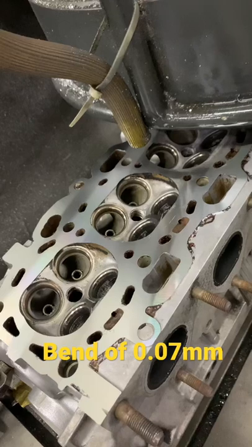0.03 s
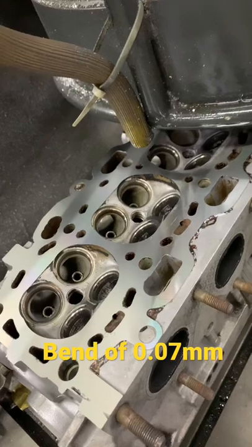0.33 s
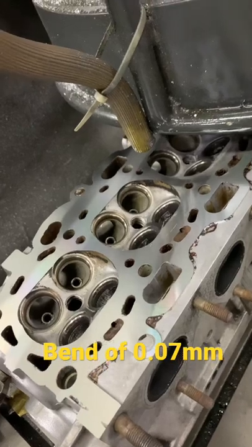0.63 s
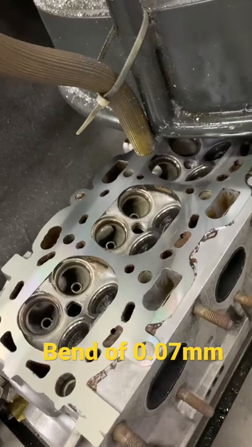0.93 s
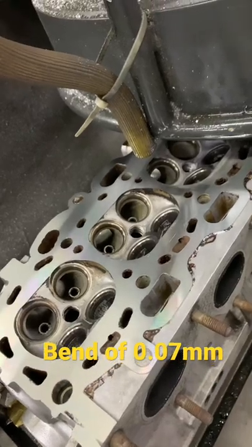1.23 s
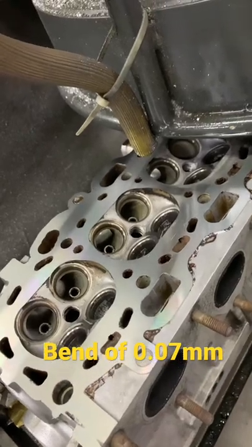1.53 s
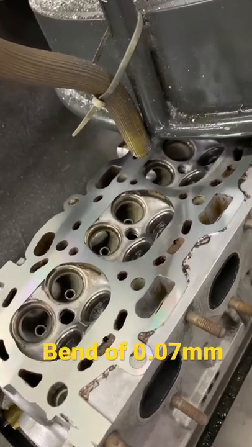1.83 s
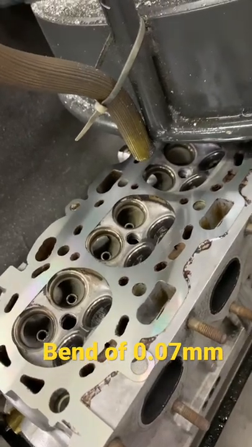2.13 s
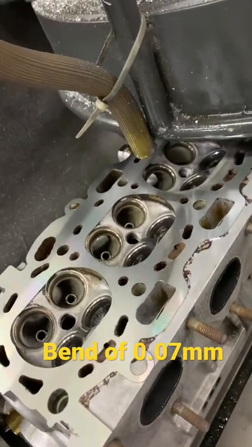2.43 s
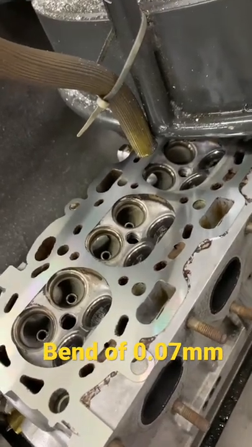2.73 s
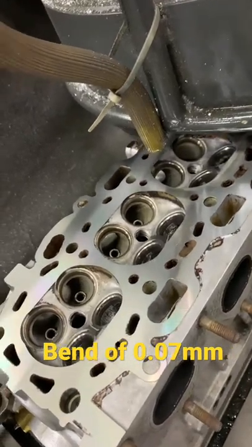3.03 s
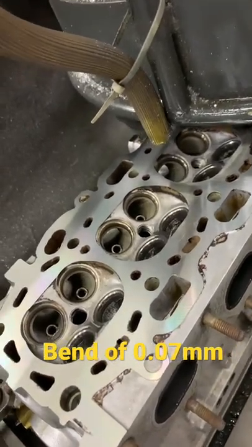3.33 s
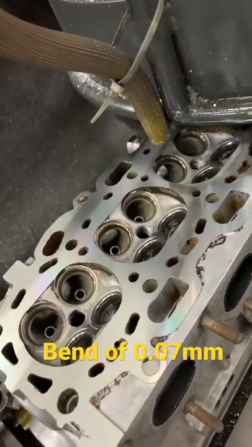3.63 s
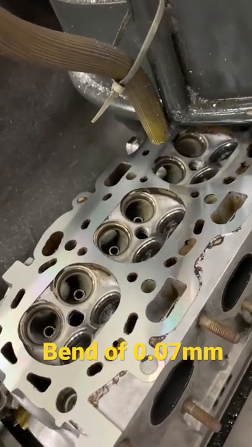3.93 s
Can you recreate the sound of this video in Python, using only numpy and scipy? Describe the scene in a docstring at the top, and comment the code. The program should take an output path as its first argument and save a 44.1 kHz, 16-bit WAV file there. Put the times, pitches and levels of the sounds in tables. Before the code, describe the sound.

A spinning cutter scrapes metal in rapid, chirping strokes while the machine hums and briefly clanks.

```python
"""A fast, gritty scraping with a chirp on every stroke: a surfacing machine skims an engine's
cylinder head, close by in a workshop. Once a turn the cutter scrapes the metal, ticks on an edge and
rings the cavity it crosses, first a deep one, later a shallow one. Underneath lies a bed of motor hum,
thin drive whine, rumble and hiss. Midway, sheet metal clanks and thumps twice with a puff of hiss."""
import sys
import numpy as np
from scipy import signal
from scipy.fft import rfft, irfft
from scipy.io import wavfile

SR = 44100
rng = np.random.default_rng(int(sys.argv[2]) if len(sys.argv) > 2 else 0)


def bounce(signal):
    """Save signal as a 16-bit WAV file at the path given by the first command-line argument."""
    frames = np.transpose(np.atleast_2d(signal))
    limited = np.clip(frames, -1, 1)
    pcm = np.round(limited * 32767).astype(np.int16)
    wavfile.write(sys.argv[1], SR, pcm)


N = 176400
TIME, FREQS = np.arange(N) / SR, np.fft.rfftfreq(N, 1 / SR)
SPIN_HZ, FIRST_CUT_S = 15.338, .0815


def amp(db):
    """Decibels to gain."""
    return 10 ** (np.asarray(db) / 20)

def unit_rms(x):
    """Scales to rms 1."""
    return x / np.sqrt(np.mean(x ** 2) + 1e-20)

def curve(points):
    """Draws a curve over the spectrum on a log-frequency axis."""
    hz, value = np.transpose(points)
    return np.interp(np.log(FREQS + 1), np.log(hz + 1), value)

def fader(points):
    """A level ride as a gain per sample."""
    return amp(np.interp(TIME, *np.transpose(points)))

def drift(rate_hz):
    """Random wander of rms 1, mostly slower than rate_hz."""
    return unit_rms(irfft(rfft(rng.standard_normal(N)) / (1 + (FREQS / rate_hz) ** 4), N))

def swell(start_s, rise_s, fall_s):
    """Linear attack, exponential decay."""
    age = np.maximum(TIME - start_s, 0)
    return np.minimum(age / rise_s, 1) * np.exp(-np.maximum(age - rise_s, 0) / fall_s)

# Stereo balance, left over right: f/Hz, level/dB
PAN = [(60, 0), (130, 1.5), (290, -0.8), (640, -1.5), (1300, -2), (3100, -2), (6800, 0)]
# Phase lead of the left side, on top of its head start: f/Hz, phase/rad
LEFT_LEAD = [(300, 0.39), (560, -2.5), (700, -1), (1400, -0.62), (4400, -0.53), (6200, -0.23)]
def stereo_image(head_start_s=.000116):
    """Left and right response: treble reaches the left first."""
    side = amp(curve(PAN) / 2)
    lead = curve(LEFT_LEAD) + 2 * np.pi * FREQS * head_start_s
    return np.array([side * np.exp(1j * lead), 1 / side])

def place(x):
    """Sets a compact source in the stereo image."""
    return irfft(rfft(x) * stereo_image(), N)

# How alike left and right are: f/Hz, coherence/0..1
COHERENCE = [(60, .99), (280, .97), (700, .62), (1900, .38), (3000, .42), (4300, .72), (5500, .96)]
def colour(pair, eq):
    """EQs two unrelated noises and blends them into one wide source."""
    a, b = rfft(pair)
    alike = np.clip(curve(COHERENCE), 0, 1)
    blend = np.array([a, alike * a + np.sqrt(1 - alike ** 2) * b]) * stereo_image()
    return irfft(blend * amp(curve(eq)) * np.sqrt(SR / 2), N)

def housing(x, wet_db, t60):
    """Short reverb: scatter off the guard and the machine bed."""
    t = TIME[:SR // 4]
    tail = rng.standard_normal((2, len(t))) * amp(-60 * t / t60) * (t > .003)
    return x + amp(wet_db) * signal.fftconvolve(x, tail / np.linalg.norm(tail[0]), axes=1)[:, :N]

def turn(delay_s, spread_db):
    """Time since the cutter last struck, and a random strength for each turn."""
    turns = (TIME - FIRST_CUT_S - delay_s) * SPIN_HZ + 2
    strengths = amp(spread_db * rng.standard_normal(N))
    return turns % 1 / SPIN_HZ, strengths[turns.astype(int)]

def groove_noise(repeat_share):
    """Noise that partly loops every turn, as the cutter retraces its groove."""
    groove = rng.standard_normal((2, round(SR / SPIN_HZ)))
    loop = groove[:, np.arange(N) % groove.shape[1]]
    return np.sqrt(repeat_share) * loop + np.sqrt(1 - repeat_share) * rng.standard_normal((2, N))

def tones(partials, waver_rad, flutter_db, rate_hz):
    """Held sines that waver in phase and level."""
    return sum(np.sqrt(2) * amp(db + flutter_db * drift(rate_hz))
               * np.sin(2 * np.pi * (hz * TIME + rng.random()) + waver_rad * drift(rate_hz))
               for hz, db in partials)

def ringing(modes, age, rough_rad):
    """Metal modes dying away from a blow, roughened by phase jitter."""
    return sum((-1) ** k * amp(db - 60 * age / t60)
               * np.sin(2 * np.pi * hz * age + rough_rad * drift(64))
               for k, (hz, db, t60) in enumerate(modes))


# Noise bed of the machine: f/Hz, level/dB per Hz
BED_EQ = [(28, -87), (45, -62.5), (65, -56), (110, -57), (145, -50), (210, -55.5), (275, -51), (340, -55),
          (480, -61), (620, -62), (1000, -67), (1500, -69.5), (2800, -76.5), (3400, -74.5), (3900, -68),
          (4350, -69), (4700, -73.5), (5250, -81), (5900, -68), (7900, -71.5), (9000, -75.5), (9900, -80.5),
          (10250, -75), (10700, -83), (15000, -82)]
def rumble_and_hiss(ripple_db=2.4, ripple_width_hz=60):
    """The machine's fluttering noise bed, with a fine, fixed random ripple colouring its treble hiss."""
    noise = groove_noise(.12) * amp(drift(24))
    bands = np.interp(FREQS / ripple_width_hz, np.arange(SR // 10), rng.standard_normal(SR // 10))
    ripple = amp(ripple_db * bands * np.clip(FREQS / 3000, 0, 1))
    return colour(unit_rms(irfft(rfft(noise) * ripple, N)), BED_EQ)

# Partials of the drive: f/Hz, level/dB
DRIVE_PARTIALS = [(3765, -52), (3952, -54), (6982, -54), (7252, -52), (7521, -51.5), (7720, -52.5),
                  (7790, -54.5), (7904, -50)]
def drive_whine():
    """The drive sings a thin, shimmering top."""
    return place(tones(DRIVE_PARTIALS, waver_rad=1, flutter_db=5.5, rate_hz=13))

# Partials of motor and frame: f/Hz, level/dB
MOTOR_PARTIALS = [(142, -47.5), (269.2, -33), (459.8, -37.5), (644, -51), (659, -49.5), (884, -48),
                  (981, -50)]
def motor_hum():
    """Motor and frame hold a gently wavering drone."""
    return place(tones(MOTOR_PARTIALS, waver_rad=.38, flutter_db=3, rate_hz=6.2))

# Frame tones that follow the deep cavity, at their loudest: f/Hz, level/dB
FRAME_FOLLOWING = [(491.5, -36.5), (983, -45.5)]
# Frame tone that ducks under the deep cavity, before ducking: f/Hz, level/dB
FRAME_DUCKING = [(537, -35.5)]
def frame_hum():
    """The frame's tones trade weight as the cutter leaves the deep cavity."""
    deep = fader(DEEP_RIDE) / fader(DEEP_RIDE).max()
    following = tones(FRAME_FOLLOWING, waver_rad=.37, flutter_db=3.5, rate_hz=4.1) * deep ** .5
    ducking = tones(FRAME_DUCKING, waver_rad=.3, flutter_db=1.5, rate_hz=3.3) * (1 - .22 * deep)
    return place(following + ducking)

# Blow on the sheet metal and its rebound: t/s, level/dB
PANEL_BLOWS = [(1.689, -1.5), (1.766, -10)]
# Dull body of the thump: f/Hz, level/dB per Hz
THUMP_EQ = [(60, -82), (170, -52), (270, -38.5), (350, -47.5), (430, -40), (520, -46.5), (650, -57.5),
            (1100, -62.5), (2200, -65), (3200, -92)]
# Airy top of the puff: f/Hz, level/dB per Hz
PUFF_EQ = [(2000, -86), (3200, -66.5), (5000, -57.5), (7000, -58), (10000, -65), (15000, -72)]
def thump(from_hz=460, to_hz=352, sag_s=.0475):
    """A double blow bends a panel's ring downward; the sheet metal booms on under a puff of hiss."""
    first_s = PANEL_BLOWS[0][0]
    punch = sum(amp(db) * swell(at, rise_s=.034, fall_s=.032) for at, db in PANEL_BLOWS)
    tail = amp(-4.5) * swell(first_s, rise_s=.034, fall_s=.22)
    boom = colour(rng.standard_normal((2, N)), THUMP_EQ) * np.hypot(punch, tail)
    puff = colour(rng.standard_normal((2, N)), PUFF_EQ) * swell(first_s, rise_s=.016, fall_s=.1)
    panel_hz = to_hz + (from_hz - to_hz) * np.exp(-np.maximum(TIME - first_s, 0) / sag_s)
    panel_gain = sum(amp(db - 12.5) * swell(at, rise_s=.013, fall_s=.022) for at, db in PANEL_BLOWS)
    panel = np.sin(2 * np.pi * np.cumsum(panel_hz) / SR) * panel_gain
    return boom + puff + place(panel)

# Modes of the sheet metal: f/Hz, level/dB, t60/s
SHEET_MODES = [(427, -16.5, 0.81), (1042, -27, 0.31), (2270, -34, 0.22), (5420, -9, 0.076),
               (5740, -18, 0.075)]
def clank(start_s=1.697, rise_s=.007):
    """Struck sheet metal gives the thump a sharp front."""
    age = np.maximum(TIME - start_s, 0)
    return place(ringing(SHEET_MODES, age, rough_rad=.78) * np.minimum(age / rise_s, 1))

def chirp(ride, from_hz, to_hz, glide_s, delay_s, rise_s, fall_s, rough_rad):
    """A short gliding ring once a turn, choked as the cutter moves on."""
    age, strength = turn(delay_s, spread_db=1.4)
    cycles = to_hz * age + (from_hz - to_hz) * glide_s * (1 - np.exp(-age / glide_s))
    cycles *= 1 + .012 * drift(SPIN_HZ)  # each turn is slightly detuned
    envelope = (1 - np.exp(-(age / rise_s) ** 2)) * np.exp(-(age / fall_s) ** 2)
    tone = np.sqrt(2) * np.sin(2 * np.pi * cycles + rough_rad * drift(215))
    return tone * envelope / envelope.max() * strength * fader(ride)

# Level ride of the edge tick: t/s, level/dB
TICK_RIDE = [(0, -25), (1.2, -31), (2.1, -34), (2.6, -31), (3.05, -28), (3.45, -31), (3.65, -23.5),
             (3.87, -23), (4, -27)]
# Bright colour of the tick: f/Hz, relative level/dB
TICK_EQ = [(500, -22), (3000, -3), (6000, 2), (7900, 11), (9000, -2), (15000, -4)]
# Level ride of the casting's clack, ring and knock: t/s, level/dB
BODY_RIDE = [(0, -28), (1.5, -34), (2.2, -33), (2.7, -29.5), (3.4, -28), (4, -33)]
# Boxy colour of the clack: f/Hz, relative level/dB
CLACK_EQ = [(300, -10), (600, 5), (1700, -10), (3200, -23)]
# Modes of the casting: f/Hz, relative level/dB, t60/s
CASTING_MODES = [(656, 2.5, 0.036), (796, -8, 0.21), (1020, -6, .08), (1506, -7, 0.053), (1796, -7, 0.26),
                 (8370, -4.5, 0.06)]
def edge_hits():
    """The cutter hits an edge: a bright tick, a short clack, a falling knock and the casting's ring."""
    age, strength = turn(delay_s=.0015, spread_db=1.16)
    attack = np.minimum(age / .001, 1) * strength
    tick = unit_rms(colour(groove_noise(.51), TICK_EQ))
    tick *= attack * np.exp(-age / .0068) * fader(TICK_RIDE)
    clack = amp(2) * unit_rms(colour(rng.standard_normal((2, N)), CLACK_EQ))
    clack *= attack * np.exp(-age / .0062) * fader(BODY_RIDE)
    ring = ringing(CASTING_MODES, age, rough_rad=.41) * strength * fader(BODY_RIDE)
    knock = chirp(BODY_RIDE, from_hz=766, to_hz=495, glide_s=.0049,
                  delay_s=.00099, rise_s=.0051, fall_s=.0086, rough_rad=.19)
    return tick + clack + housing(place(ring + knock), wet_db=-21, t60=.028)

# Level ride of the deep cavity: t/s, level/dB
DEEP_RIDE = [(0, -27), (.15, -24.5), (.7, -26.5), (1.2, -31.5), (1.35, -35.5), (1.6, -51), (2, -38)]
# Level ride of the shallow cavity: t/s, level/dB
SHALLOW_RIDE = [(1.6, -38.5), (2, -37), (2.3, -30.5), (2.8, -29), (3.1, -30.5), (3.45, -36.5), (3.7, -51)]
def cavities():
    """Cavities ring under the cutter: first a falling chirp, later a shorter, drier, rising one."""
    deep = chirp(DEEP_RIDE, from_hz=2170, to_hz=1780, glide_s=.0044,
                 delay_s=.003, rise_s=.0027, fall_s=.012, rough_rad=.32)
    shallow = chirp(SHALLOW_RIDE, from_hz=2130, to_hz=2482, glide_s=.0035,
                    delay_s=0, rise_s=.0039, fall_s=.006, rough_rad=.38)
    return housing(place(deep), wet_db=-10, t60=.11) + housing(place(shallow), wet_db=-13, t60=.06)

# Colour of the cutter on the metal: f/Hz, level/dB per Hz
SCRAPE_EQ = [(60, -74), (200, -68.5), (400, -49), (600, -67), (1000, -67.5), (1500, -62.5), (3000, -73.5),
             (4500, -72), (5900, -66.5), (8400, -68.5), (11000, -71.5), (15000, -72.5)]
# Weight of the cut as the head feeds through: t/s, level/dB
LOAD_RIDE = [(0, -0.5), (.8, -1), (1.4, -2), (2.1, -4), (2.7, -2.5), (3.3, -6), (4, -4.5)]
def scrape(rise_s=.0055, decay_from_s=.0062, fall_s=.014):
    """A burst of gritty noise each time the cutter sweeps the face."""
    age, strength = turn(delay_s=0, spread_db=-1.5)
    envelope = np.minimum(age / rise_s, 1) * np.exp(-np.maximum(age - decay_from_s, 0) / fall_s)
    strokes = groove_noise(.92) * envelope * strength * fader(LOAD_RIDE)
    grit = amp(2.05 * drift(1100))
    return colour(strokes * grit, SCRAPE_EQ)


def scene():
    """The mix: the cut up front, the machine bed behind, one sheet-metal accent midway."""
    cut = scrape() + cavities() + edge_hits()
    bed = motor_hum() + frame_hum() + drive_whine() + rumble_and_hiss()
    return cut + bed + thump() + clank()

def record(dry):
    """A hard entry after an instant of silence, then a steep high cut."""
    start_s, cutoff_hz = .035, 15950
    high_cut = signal.firwin(511, cutoff_hz, window=("kaiser", 9), fs=SR)
    return signal.oaconvolve(dry * (TIME > start_s), high_cut[None], "same")


dry = scene()
out = record(dry)
bounce(out)
```